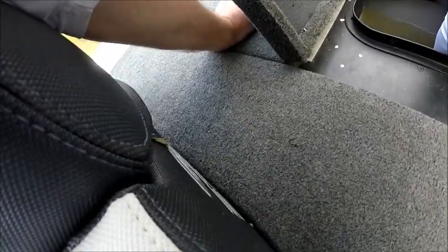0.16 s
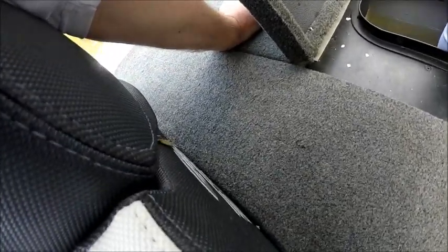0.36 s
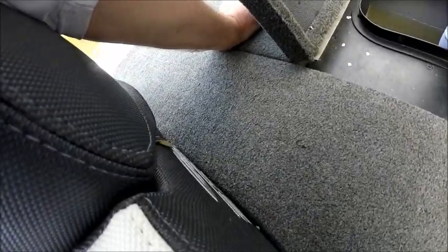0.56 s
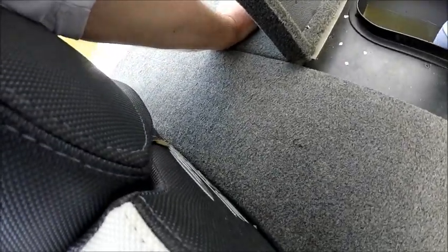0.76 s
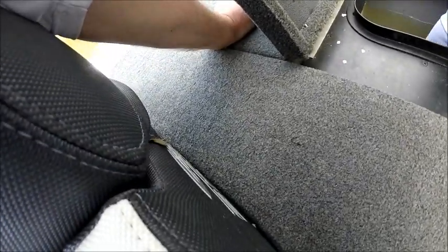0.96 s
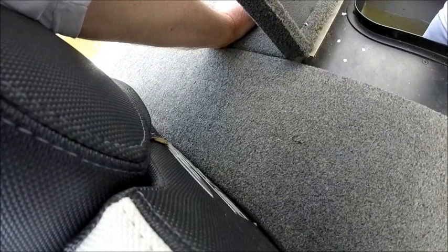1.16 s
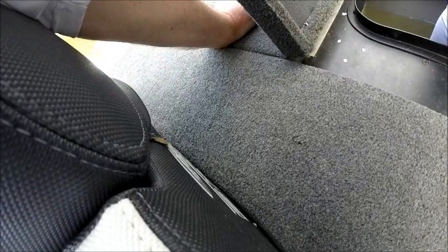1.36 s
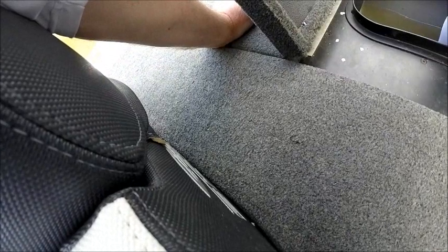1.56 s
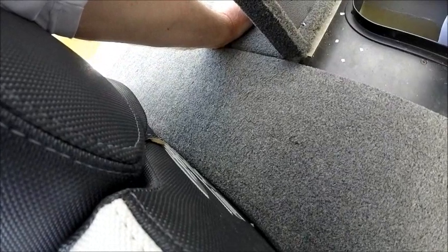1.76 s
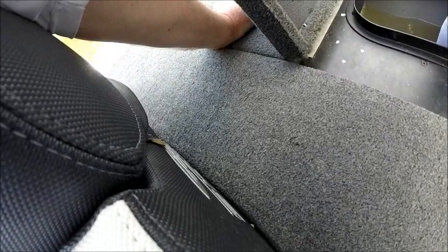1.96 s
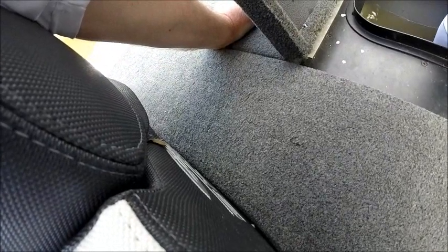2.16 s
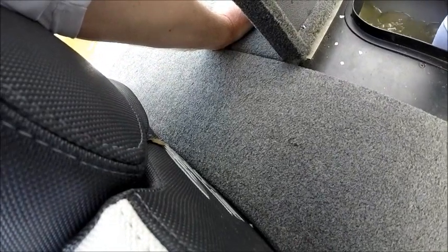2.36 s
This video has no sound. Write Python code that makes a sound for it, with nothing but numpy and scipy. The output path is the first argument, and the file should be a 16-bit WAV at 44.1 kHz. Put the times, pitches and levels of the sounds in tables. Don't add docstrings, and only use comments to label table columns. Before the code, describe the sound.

Fish thrash in a boat's livewell, thumping the hull and slapping walls, ending in a splash

```python
import sys
import numpy as np
from scipy import signal
from scipy.fft import rfft, irfft
from scipy.io import wavfile
from scipy.ndimage import uniform_filter1d

SR = 44100
rng = np.random.default_rng(int(sys.argv[2]) if len(sys.argv) > 2 else 0)


def file_out(sig):
    cols = np.atleast_2d(sig).T
    lim = np.clip(cols, -1, 1)
    pcm = np.round(lim * 32767).astype(np.int16)
    wavfile.write(sys.argv[1], SR, pcm)


def to_linear_factor(level_db):
    exponent = np.asarray(level_db, float) / 20
    return 10 ** exponent


N = 110250
T = np.arange(N) / SR

# (frequency [Hz], density [dB per Hz])
SPLASH_COLOUR = [(450, -6), (1450, -3), (2600, -10), (6500, -21), (16000, -26)]


def rms_one(x):
    return x / np.sqrt(np.mean(x ** 2) + 1e-20)


def curve(rows, axis=1):
    return np.interp(T, np.array(rows)[:, 0], np.array(rows)[:, axis])


def drift(rate):
    pole = np.exp(-2 * np.pi * rate / SR)
    settle = SR // 4
    slow = signal.lfilter([1], [1, -2 * pole, pole * pole], rng.standard_normal(N + settle))
    return rms_one(slow[settle:])


def coloured(spectrum, x):
    hz, db = np.transpose(spectrum)
    f = np.maximum(np.arange(N // 2 + 1) * SR / N, 1)
    gain = to_linear_factor(np.interp(np.log(f), np.log(hz), db, left=-70, right=-70))
    return rms_one(irfft(rfft(x) * gain, N))


def ring(x, hz, t60):
    radius = to_linear_factor(-60 / (t60 * SR))
    angle = 2 * np.pi * min(hz, .45 * SR) / SR
    return signal.lfilter([0, np.sin(angle)], [1, -2 * radius * np.cos(angle), radius ** 2], x + 1e-18)


def patchy(spectrum, patchy_db, rate):
    x = coloured(spectrum, rng.standard_normal(N))
    out = np.zeros(N)
    for low in 16 * 2. ** np.arange(10):
        octave = signal.butter(2, [low, 2 * low], "band", fs=SR, output="sos")
        out += to_linear_factor(patchy_db * drift(rate)) * signal.sosfilt(octave, x)
    return rms_one(out)


def thumps(rows):
    rise_cycles, sag = .6, .05
    partner_ratio, partner_db = .7, -16
    rattle_db, rattle_longer = -23, 1.66
    out, rattle_power = np.zeros(N), np.zeros(N)
    for (s, db, hz, t60), turn in zip(rows, rng.random(len(rows))):
        i = slice(int(s * SR), int(s * SR) + SR // 2)
        t = np.maximum(T[i] - s, 0)
        phase = 2 * np.pi * hz * (t + sag * t60 * (1 - np.exp(-4 * t / t60)) / 4)
        shape = (1 - np.exp(-t * hz / rise_cycles)) ** 2 * to_linear_factor(-60 * t / t60)
        shape = shape / shape.max()
        partner = to_linear_factor(partner_db) * np.sin(partner_ratio * phase + 2 * np.pi * turn)
        out[i] += to_linear_factor(db) * shape * (partner - np.sin(phase))
        rattle_power[i] += to_linear_factor(2 * db) * shape ** (2 / rattle_longer)
    wall_band = signal.cheby1(5, 1, [150, 670], "band", fs=SR, output="sos")
    wall = rms_one(signal.sosfilt(wall_band, rng.standard_normal(N)))
    return out + to_linear_factor(rattle_db) * np.sqrt(rattle_power) * wall


def bursts(rows, colour, rise_s, tone_db, width, grain_db, tail_db):
    x = coloured(colour, rng.standard_normal(N) * to_linear_factor(grain_db * drift(190)))
    white = rng.standard_normal(N) * to_linear_factor(grain_db * drift(200))
    dulling = signal.butter(2, 4500, fs=SR, output="sos")
    out = np.zeros(N)
    for s, db, hz, t60 in rows:
        start = int(s * SR)
        i = slice(start, start + SR // 2)
        t = T[i] - T[start]
        ring_s = 1.5 / (width * hz)
        tone = ring(ring(np.diff(white[i], prepend=0), hz, ring_s), hz, ring_s)
        body = rms_one(x[i] + to_linear_factor(tone_db) * rms_one(tone))
        tail = to_linear_factor(tail_db - 15 * t / t60) * signal.sosfilt(dulling, body)
        out[i] += to_linear_factor(db - 11.5) * np.minimum(t / rise_s, 1) * (to_linear_factor(-60 * t / t60) * body + tail)
    return out


def wind(db, patchy_db):
    # (frequency [Hz], density [dB per Hz])
    wind_colour = [(15, -14), (25, -7.5), (90, -8.5), (200, -21)]
    return to_linear_factor(db) * patchy(wind_colour, patchy_db, rate=8)


def lapping():
    # (frequency [Hz], density [dB per Hz])
    lap_colour = [(60, -33), (120, 9), (450, 4), (800, -9.5), (3000, -22)]
    # (time [s], level [dB])
    lap_level = [
        (0, -61),
        (.5, -63),
        (.82, -52.5),
        (.95, -59),
        (1.25, -54.5),
        (1.45, -85),
    ]
    return to_linear_factor(curve(lap_level)) * patchy(lap_colour, patchy_db=1.0, rate=20)


def squeak():
    # (time [s], frequency [Hz], level [dB])
    glide = [
        (0, 2400, -60),
        (.06, 2720, -55),
        (.135, 3040, -57.5),
        (.17, 3060, -55),
        (.21, 3040, -63),
        (.45, 3090, -77.5),
    ]
    # (multiple of the fundamental [1], level [dB])
    overtones = [(2, -11.5), (3, -26), (4, -22)]
    end_s, flutter_db, jitter = .19, 4, .028
    phase = 2 * np.pi * np.cumsum(curve(glide) * (1 + jitter * drift(580))) / SR
    top = sum(to_linear_factor(db) * np.sin(k * phase) for k, db in overtones)
    top = top * np.clip((end_s - T) / 0.023, 0, 1)
    level = to_linear_factor(curve(glide, axis=2) + 2.5 + flutter_db * drift(105))
    return level * np.clip((.6 - T) / 0.11, 0, 1) * (np.sin(phase) + top)


def drips():
    # (time [s], peak level [dB], pitch [Hz], decay t60 [s])
    drip_events = [(.156, -41, 3600, 0.29), (.234, -25.5, 530, 0.015), (.478, -34, 970, .035),
                   (.6245, -44, 4500, .04), (.842, -43, 4600, .04), (.8624, -42, 5360, .04),
                   (.921, -36, 4700, .04), (.9975, -35, 3270, .05), (.998, -30.5, 533, .04),
                   (1.1945, -22, 5900, 0.015), (1.222, -43, 7700, .03), (1.2785, -35.5, 1280, .04),
                   (1.46, -17, 4300, .05), (1.441, -40, 2800, .03), (1.506, -36, 5000, .015),
                   (1.526, -35, 7500, .01), (1.551, -42, 4500, .015), (.44, -46, 4200, .02),
                   (1.15, -46, 2500, .02), (1.213, -39, 4500, .02), (1.267, -44, 1500, .03),
                   (1.9187, -52, 6000, .01), (1.9686, -48, 7000, .02), (1.9995, -50, 7000, .01),
                   (2.0504, -38, 8000, .015), (2.1108, -50, 7000, .01), (1.663, -27, 7000, .015),
                   (1.75, -40, 6000, .012), (1.8475, -21, 7800, 0.009), (2.018, -42, 8800, .012),
                   (2.023, -44, 8000, .012)]
    # (frequency [Hz], density [dB per Hz])
    drip_colour = [(500, 10), (3000, 23), (7000, 12), (16000, 0)]
    return bursts(drip_events, drip_colour, rise_s=.0007, tone_db=6, width=.45, grain_db=1.5, tail_db=-25)


def wash():
    # (time [s], level [dB])
    spray_level = [
        (2.15, -55.5),
        (2.25, -44.5),
        (2.5, -49.5),
    ]
    births_per_s, fizz_cycles, fizz_db, kinds = 500, 16.0, -3, 16
    born = rng.random(N) < births_per_s / SR
    strength = to_linear_factor(3 * np.minimum(rng.exponential(1, N), 4)) * rng.choice([-1, 1], N)
    kind = rng.integers(0, kinds, N)
    fizz = np.zeros(N)
    for k, hz in enumerate(np.geomspace(1300, 4500, kinds)):
        fizz += ring(born * strength * (kind == k), hz, fizz_cycles * 2 / hz)
    spray = signal.lfilter([.5], [1, -.5], patchy(SPLASH_COLOUR, patchy_db=2.5, rate=30))
    level = to_linear_factor(curve(spray_level)) * np.clip((T - 2.15) / .03, 0, 1)
    return level * (spray + to_linear_factor(fizz_db) * rms_one(fizz))


def bubbles():
    # (time [s], peak level [dB], pitch [Hz], decay t60 [s])
    bubble_events = [(2.246, -28, 4000, .04), (2.284, -39, 4200, .05), (2.31, -38, 2200, .03),
                     (2.322, -33, 2150, .07), (2.33, -30, 4200, .025), (2.351, -36, 1500, .07),
                     (2.353, -40, 3800, .03), (2.358, -40, 3200, .04), (2.377, -41, 3700, .04),
                     (2.386, -40, 2300, .03), (2.393, -40, 1500, .04), (2.419, -33, 1480, .07),
                     (2.426, -36, 3700, .05), (2.431, -34, 2100, .03), (2.437, -28, 2600, .05),
                     (2.448, -33, 1480, .05), (2.452, -36, 2700, .05), (2.471, -33, 1350, .04),
                     (2.478, -33, 1450, .05), (2.492, -37, 1500, .05)]
    climb = 0.08
    out, wobble = np.zeros(N), 1.1 * drift(250)
    for s, db, hz, t60 in bubble_events:
        t = np.maximum(T - s, 0)
        phase = 2 * np.pi * hz * (t + climb * t ** 2 / t60) + wobble
        out += to_linear_factor(db - 60 * t / t60) * np.minimum(t / .0015, 1) * np.sin(phase)
    return out


def splashes():
    # (time [s], peak level [dB], pitch [Hz], decay t60 [s])
    splash_events = [(2.192, -20, 2080, 0.071), (2.213, -34, 2100, 0.05), (2.239, -17, 4300, 0.06),
                     (2.2135, -21, 5400, .025), (2.278, -38, 7300, .03), (2.496, -38, 7300, .02),
                     (2.318, -24, 2070, 0.087), (2.329, -23, 4300, 0.04), (2.355, -47, 3400, 0.05),
                     (2.423, -29, 3800, 0.08), (2.429, -24, 5500, 0.05), (2.434, -27, 13000, 0.06),
                     (2.464, -25, 9700, 0.02), (2.464, -25, 3700, 0.03)]
    return bursts(splash_events, SPLASH_COLOUR, rise_s=.003, tone_db=1, width=.3, grain_db=3, tail_db=-26)


def big_splash():
    # (time [s], level [dB], decay t60 [s])
    drop_bursts = [
        (2.2385, 0, .02),
        (2.243, -2, .03),
        (2.2515, -11, .02),
        (2.255, -23, .15),
    ]
    # (frequency [Hz], level [dB])
    air_modes = [(1550, -9), (1910, -7), (2160, 2), (2510, -5), (2740, -9)]
    drops = sum((T > s) * to_linear_factor(db - 60 * np.maximum(T - s, 0) / t60) for s, db, t60 in drop_bursts)
    x = sum(to_linear_factor(db) * ring(drops * rng.standard_normal(N), hz, .025) for hz, db in air_modes)
    return to_linear_factor(-9) * x / np.abs(x).max()


def tail_slaps():
    # (time [s], peak level [dB], pitch [Hz], decay t60 [s])
    slap_events = [(1.456, -18, 1180, 0.1), (1.521, -26, 1230, 0.11), (1.6215, -22, 2300, 0.13),
                   (1.655, -17.5, 1525, 0.038), (1.692, -30, 2200, 0.12), (1.7174, -35, 2200, 0.1),
                   (1.787, -31, 1300, .05), (1.7965, -27, 2000, 0.05), (1.799, -16, 1100, .045),
                   (1.811, -29, 1100, .05), (1.818, -33, 2300, .04), (1.826, -32, 2000, .015),
                   (1.839, -28, 2000, .03), (1.843, -14, 2000, 0.025), (1.474, -22, 1300, .15),
                   (1.531, -20, 1500, .08), (1.967, -30, 1280, 0.24), (2.0445, -26, 1380, 0.11),
                   (2.1076, -40, 1210, 0.054), (2.1511, -19, 1380, 0.084)]
    # (frequency [Hz], density [dB per Hz])
    slap_colour = [(400, 6), (700, 9), (1300, 8.5), (2900, -3), (4400, -7), (6500, -24), (16000, -48)]
    return bursts(slap_events, slap_colour, rise_s=0.0024, tone_db=-8, width=0.18, grain_db=4, tail_db=-27)


def churn(rate):
    # (time [s], level [dB])
    thrash_level = [
        (1.3, -31.5),
        (1.44, -37.5),
        (1.47, -12.5),
        (1.77, -27),
        (1.93, -31),
        (2.2, -20.5),
        (2.5, -41),
    ]
    # (frequency [Hz], density [dB per Hz])
    churn_colour = [(30, -35), (60, 15.5), (100, 8), (260, -2), (370, -16), (550, -7.5), (780, -42),
                    (5000, -58)]
    level = to_linear_factor(curve(thrash_level)) * np.clip((T - 1.29) / .02, 0, 1) ** 2
    return level * patchy(churn_colour, patchy_db=3.0, rate=rate)


def wall_knocks():
    # (time [s], peak level [dB], pitch [Hz], decay t60 [s])
    knock_events = [(1.279, -33, 313, 0.031), (1.322, -31.5, 293, 0.067), (1.456, -21, 479, 0.19),
                    (1.47, -10.5, 235, 0.12), (1.528, -17, 531, 0.13), (1.555, -19.5, 510, 0.038),
                    (1.668, -12, 140, 0.06), (1.351, -38, 600, .03), (1.537, -14, 500, .03),
                    (1.794, -20, 330, .03), (1.7985, -8, 400, 0.016), (1.802, -9, 270, 0.02),
                    (1.8085, -12, 270, .02), (1.816, -14, 215, 0.056), (1.812, -17, 540, 0.055),
                    (1.8452, -1, 250, 0.015), (1.844, -20, 393, 0.02), (1.97, -14.5, 242, 0.066),
                    (2.0455, -8, 205, 0.022), (2.11, -16, 208, 0.058), (2.154, -13.5, 196.4, 0.098),
                    (2.21, -28, 176, 0.027), (2.16, -28, 549.2, 0.19), (1.99, -20.5, 290, 0.036)]
    return thumps(knock_events)


def hull_booms():
    # (time [s], peak level [dB], pitch [Hz], decay t60 [s])
    boom_events = [(.232, -32.5, 190, 0.02), (1.305, -35, 115.6, 0.45), (1.363, -23, 87, 0.075),
                   (1.405, -32, 65, 0.05), (1.452, -3, 140, 0.09), (1.47, -10.5, 70, 0.07),
                   (1.508, -6.5, 101, 0.14), (1.56, -29, 127, 0.033), (1.586, -13, 72, 0.067),
                   (1.6595, -2, 178, 0.028), (1.686, -8, 103, 0.13), (1.724, -11, 98, 0.15),
                    (2.158, -16, 140, 0.12), (2.0055, -12, 88, 0.07), (1.966, -17, 100, .15),
                   (2.25, -39, 97.2, 0.6), (2.327, -18, 108, 0.06), (2.4, -42, 84, .2)]
    return thumps(boom_events)


def scene():
    background = wind(db=-55.5, patchy_db=1.5) + lapping() + squeak() + drips()
    water = wash() + bubbles() + splashes() + big_splash() + tail_slaps()
    hull = churn(rate=16.5) + wall_knocks() + hull_booms()
    mid = background + water + hull
    high = signal.sosfilt(signal.butter(2, 6000, "high", fs=SR, output="sos"), mid)
    side = to_linear_factor(-34) * np.roll(mid, 300) + to_linear_factor(-12.5) * np.roll(high, 400)
    side = side + wind(db=-74.5, patchy_db=0.0) + to_linear_factor(-30) * churn(rate=12)
    return np.array([mid + side, mid - side])


def top_cut(x):
    return signal.sosfilt(signal.butter(12, 16480, fs=SR, output="sos"), x)


def record(dry):
    # (frequency [Hz], density [dB per Hz])
    hiss_colour = [(800, -1.5), (2000, -3.5), (9500, -11.5), (16000, -11)]
    hiss_db, alike = -63, 0.87
    knee_db, slope, release_db_per_s = -11, 1.2, 30
    common = np.sqrt((1 + alike) / 2) * coloured(hiss_colour, rng.standard_normal(N))
    opposed = np.sqrt((1 - alike) / 2) * coloured(hiss_colour, rng.standard_normal(N))
    hiss = to_linear_factor(hiss_db) * (common + opposed * np.array([[1], [-1]]))
    level = 20 * np.log10(np.abs(dry[0]) + 1e-5)
    held = np.maximum.accumulate(level + release_db_per_s * T) - release_db_per_s * T
    duck = to_linear_factor(-slope * uniform_filter1d(np.maximum(held - knee_db, 0), size=200))
    clipped = np.clip(dry + duck * hiss, -.97, .97)
    low_pass = signal.cheby2(12, 70, 16600, fs=SR, output="sos")
    return top_cut(signal.sosfilt(low_pass, clipped))


dry = scene()
out = record(dry)
file_out(out)
```